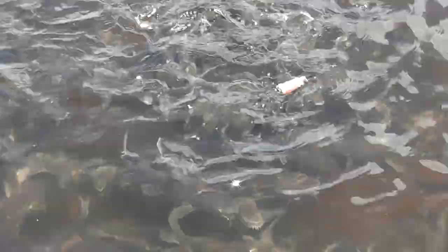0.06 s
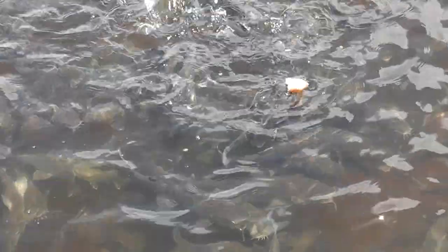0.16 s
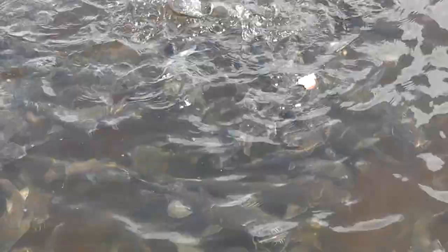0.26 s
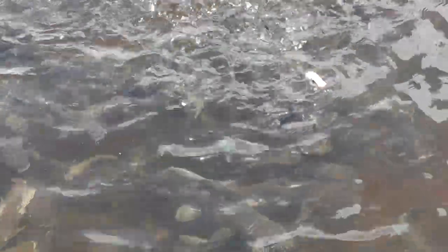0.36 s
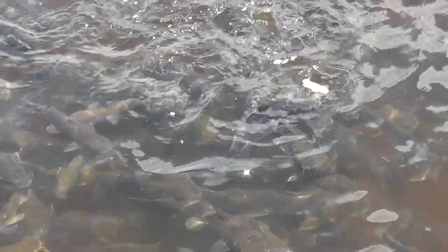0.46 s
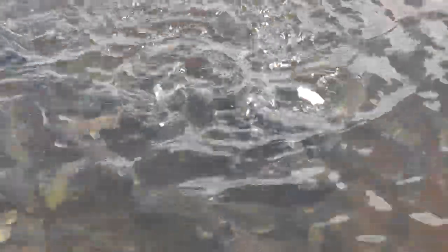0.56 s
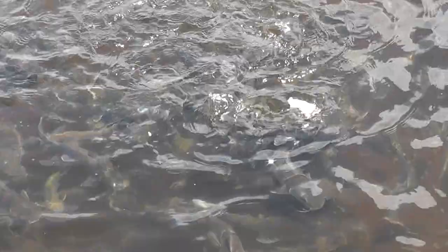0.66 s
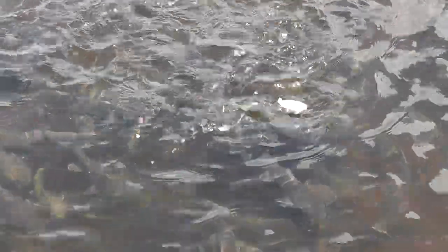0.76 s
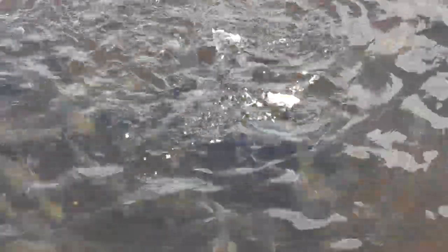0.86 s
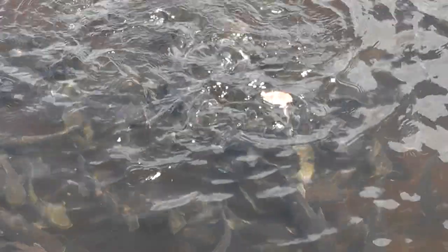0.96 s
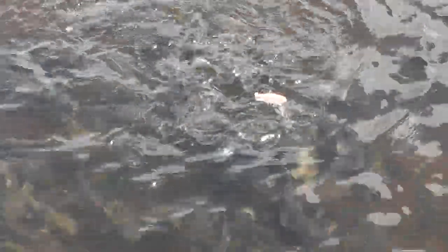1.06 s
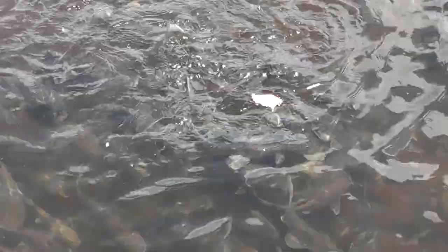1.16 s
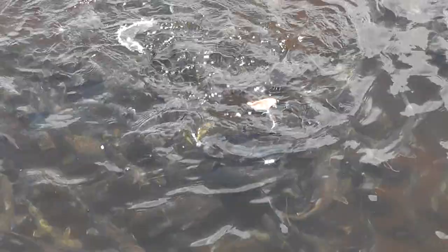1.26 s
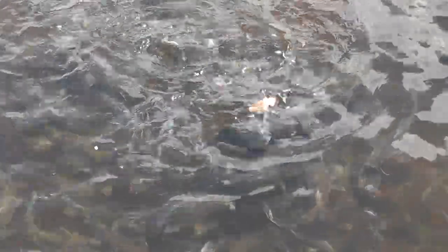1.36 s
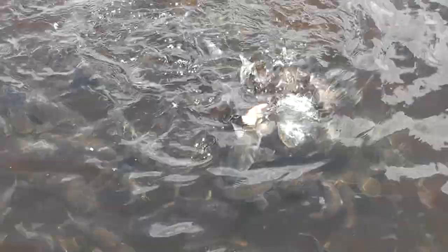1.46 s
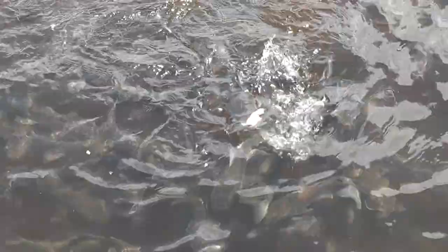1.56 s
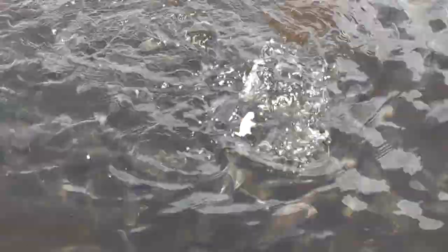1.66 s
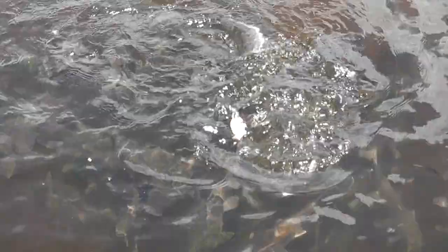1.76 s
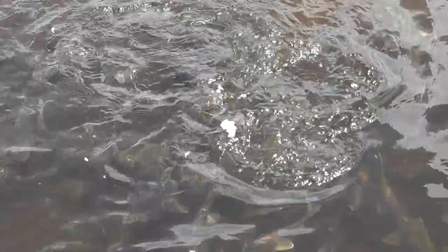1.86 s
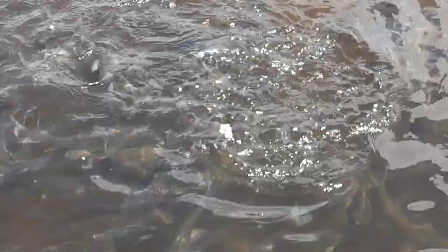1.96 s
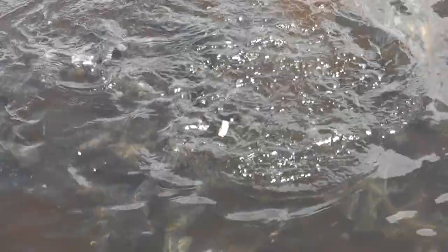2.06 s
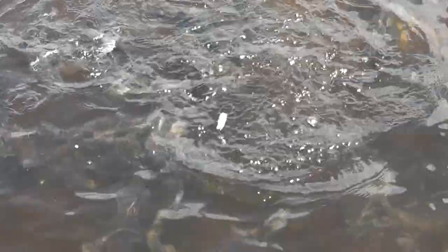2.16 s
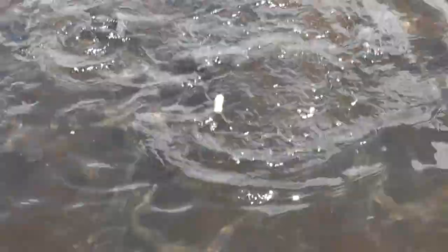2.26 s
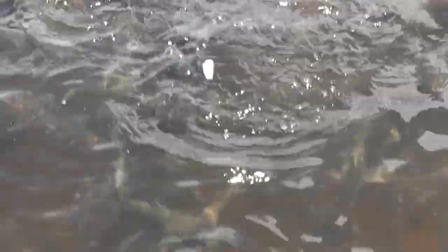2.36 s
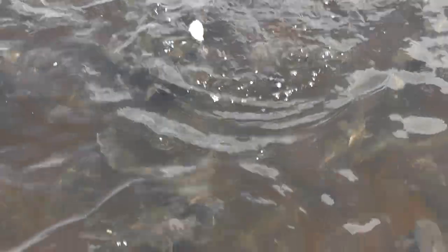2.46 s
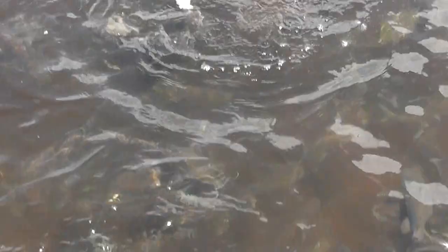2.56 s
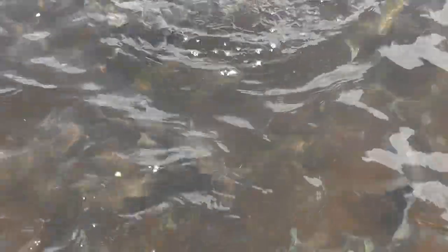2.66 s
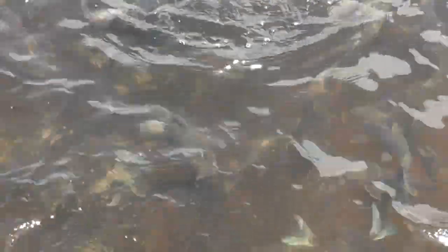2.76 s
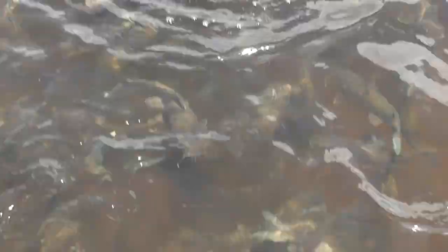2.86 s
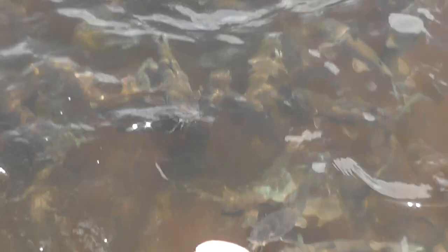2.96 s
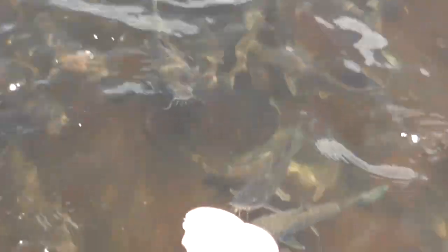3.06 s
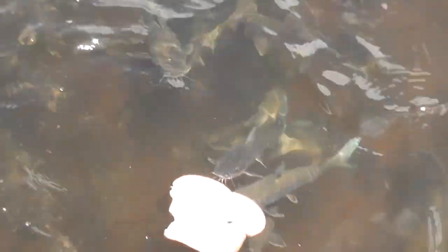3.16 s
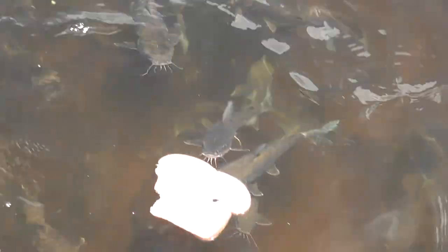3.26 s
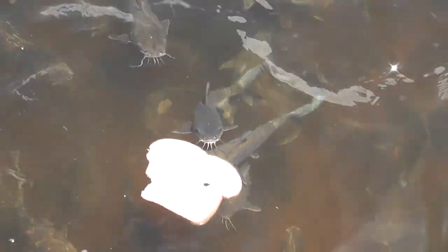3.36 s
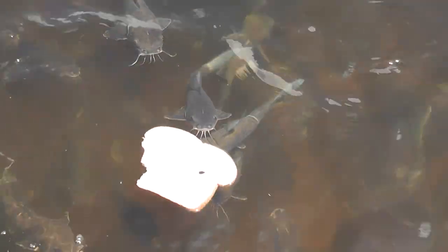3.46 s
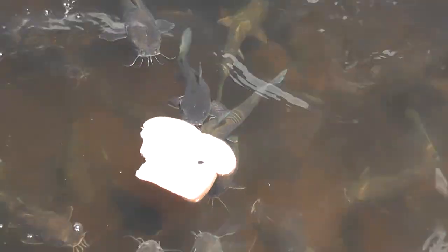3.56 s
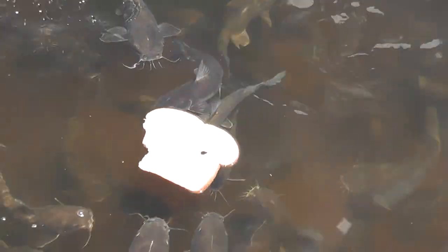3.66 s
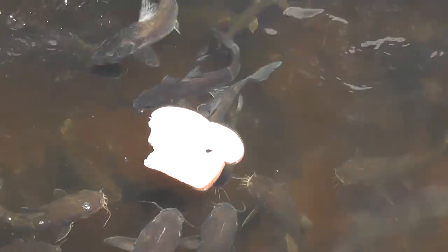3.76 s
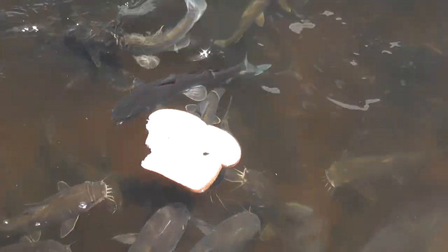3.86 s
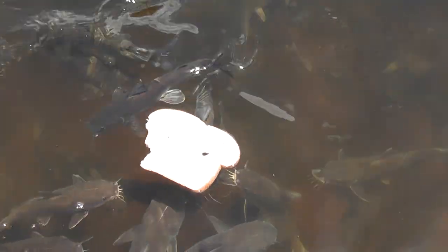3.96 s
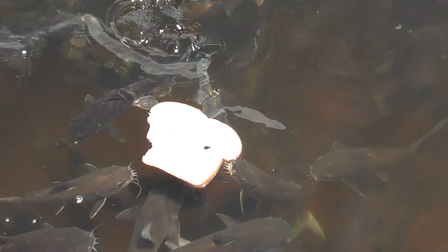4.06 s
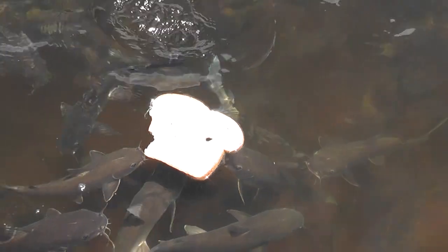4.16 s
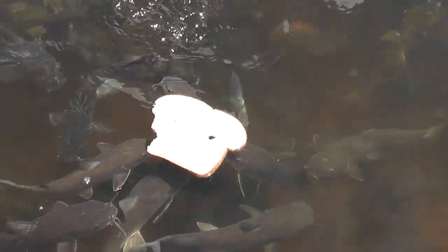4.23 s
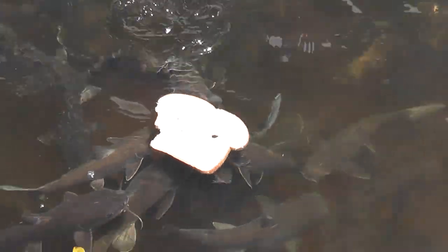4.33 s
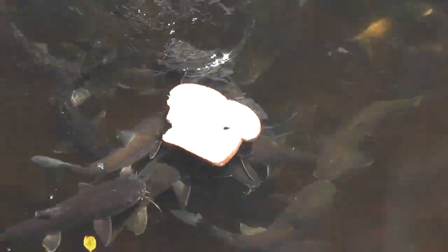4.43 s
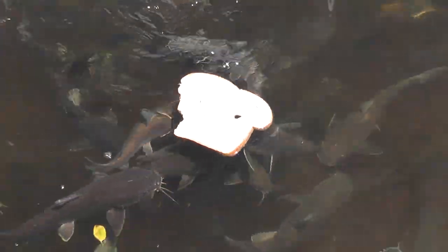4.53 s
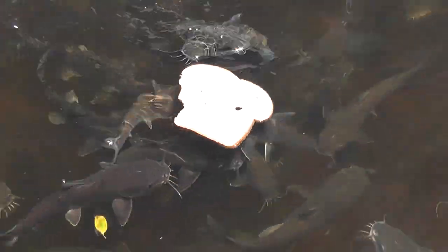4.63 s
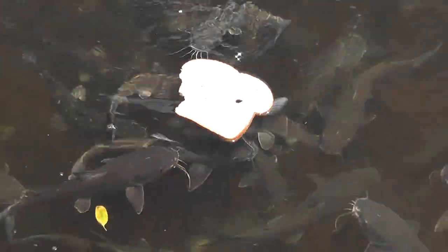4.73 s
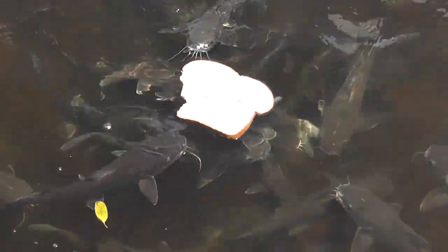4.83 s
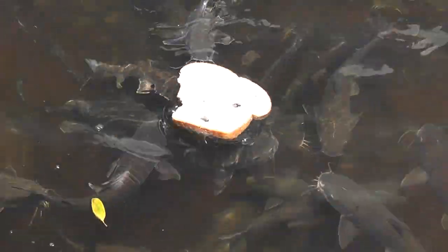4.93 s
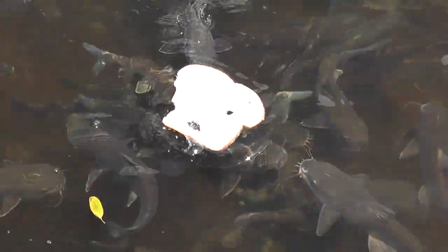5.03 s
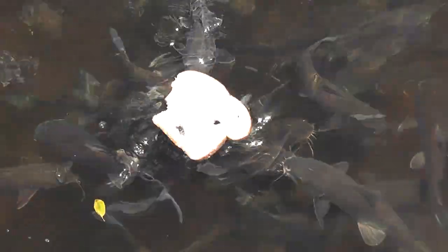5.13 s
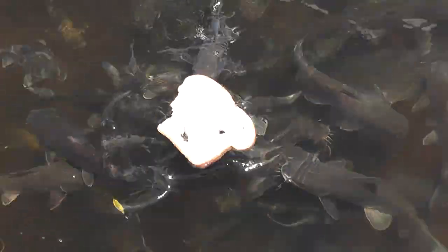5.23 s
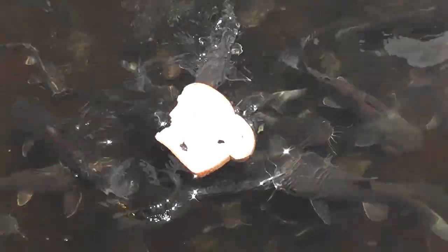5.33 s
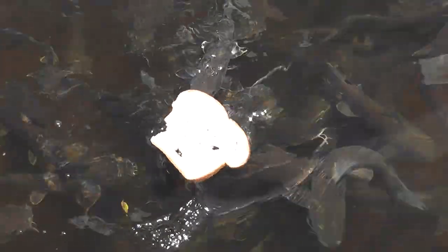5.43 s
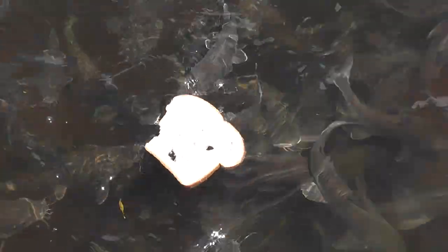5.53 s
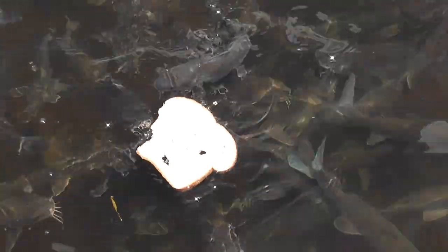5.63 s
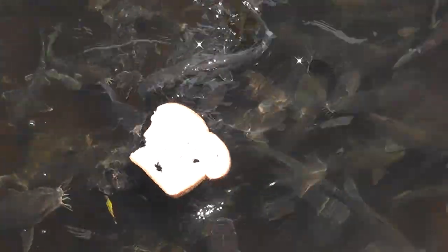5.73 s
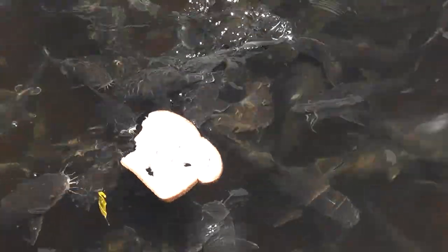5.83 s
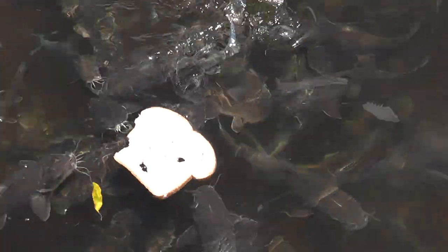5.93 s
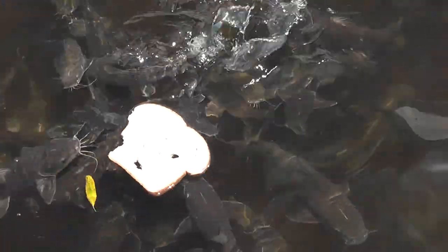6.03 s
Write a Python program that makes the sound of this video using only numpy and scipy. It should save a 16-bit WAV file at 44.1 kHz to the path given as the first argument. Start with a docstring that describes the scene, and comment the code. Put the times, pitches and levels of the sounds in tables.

```python
"""Catfish snatch at bread floating beside a dock, heard from a metre or two above the water.
First come faint plops, drips and light slaps; from about 1.1 s loud slaps and ringing air pockets crowd together.
Near 2.3 s it calms to soft low bumps; after 3 s the slaps, plops and sweeping hollows return in bursts to the end.
Mouths and tails slap the surface, trapped air rings, and closing hollows sweep up in pitch.
Tail strokes set the water gurgling and spray pattering throughout, over a faint outdoor hush."""
import sys
import numpy as np
from scipy import signal
from scipy.fft import rfft, irfft, next_fast_len
from scipy.io import wavfile
from scipy.ndimage import uniform_filter1d

SR = 44100
rng = np.random.default_rng(int(sys.argv[2]) if len(sys.argv) > 2 else 0)


def int16_out(signal):
    """Quantize to a 16-bit WAV file."""
    q = np.round(np.clip(np.atleast_2d(signal).T, -1, 1) * 32767)
    wavfile.write(sys.argv[1], SR, q.astype(np.int16))


N = 268569

# spectrum of water torn by an impact, for slaps and drips: f/Hz, relative density/dB per Hz
IMPACT_SPECTRUM = [(900, -24.5), (1800, -13), (4000, 2), (5500, -4.5), (6500, -0.5), (8500, -0.5),
                   (11000, 3.5), (13500, -8), (16000, -4)]
PLOP_SWELL = 0.095  # share of the nominal length in which a plop or a drip's bubble swells


def undb(db):
    """Amplitude ratio from a level: twenty decibels per factor of ten."""
    return 10 ** (np.asarray(db) / 20)


def unit(x):
    """Normalisation to a root-mean-square value of 1."""
    return x / np.sqrt(np.mean(x ** 2) + 1e-20)


def curves(table):
    """Linear interpolation in time of each column of (t/s, ..) rows."""
    times, *columns = np.transpose(table)
    return [np.interp(np.arange(N) / SR, times, column) for column in columns]


def across(points):
    """Interpolation of (f/Hz, value) points on a logarithmic frequency axis, bin by bin."""
    hz, value = np.transpose(points)
    bins_hz = np.fft.rfftfreq(next_fast_len(N), 1 / SR)
    return np.interp(np.log(bins_hz + 1), np.log(hz), value)


def filtered(x, response):
    """Linear filtering as a product of spectra."""
    size = next_fast_len(N)
    return irfft(rfft(x, size) * response, size)[:N]


def colour(x, points):
    """Minimum-phase filtering: a folded cepstrum makes it causal; white noise keeps its power."""
    size = next_fast_len(N)
    cepstrum = irfft(np.log(unit(undb(across(points)))), size)
    cepstrum[1:size // 2] *= 2
    cepstrum[size // 2:] = 0
    return filtered(x, np.exp(rfft(cepstrum)))


def add(track, s, sound):
    """Superposition of a sound that starts at time s."""
    i = int(np.clip(s * SR, 0, N - 1))
    track[..., i:i + sound.shape[-1]] += sound[..., :N - i]


def walk(rate):
    """Smoothed random fluctuation: held chance values, rate per second, averaged to rms 1."""
    hold = max(int(SR / rate), 1)
    steps = np.repeat(rng.standard_normal(N // hold + 1), hold)
    return unit(uniform_filter1d(steps, hold)[:N])


def placed(x, pan_db):
    """Stereo position by level difference, left minus right."""
    return np.array([x * undb(pan_db / 2), x * undb(-pan_db / 2)])


def bubble(first_hz, last_hz, length, swell, fall_db=24, bend=1.213):
    """Damped resonance of trapped air: it swells and dies; its pitch glides ever faster near the surface."""
    u = np.arange(int(1.6 * length * SR)) / (length * SR)  # time in nominal lengths
    swell = np.clip(swell, .02, .85)
    hz = first_hz * (last_hz / first_hz) ** (u ** bend)  # last_hz is reached at u = 1
    rise = np.sin(np.pi / 2 * np.minimum(u / swell, 1))
    fall = undb(-fall_db * np.maximum(u - swell, 0) / (1 - swell))
    close = np.minimum((u[-1] - u) * 4, 1)  # ends at zero
    return rise * fall * close * np.sin(2 * np.pi * np.cumsum(hz) / SR)


def swarm(rate, low_hz, high_hz, cycles, glide, spread_db):
    """Random superposition of bubbles, rate per second, with chance pitch, damping and place; rms 1."""
    out, total = np.zeros((2, N)), int(rate * N / SR)
    for k, (when, size, life, climb, strength, side, swell) in enumerate(rng.random((total, 7))):
        hz = low_hz * (high_hz / low_hz) ** size
        length = cycles * 4 ** (life - .5) / hz  # half to twice the usual cycles
        ring = bubble(hz, hz * (1 + glide * (climb - .3)), length, .04 + .3 * swell ** 2)
        gain = undb(spread_db * strength ** 2)  # many faint, a few clear
        add(out, (k + 3 * when) / rate, placed(gain * ring, 10 * (side - .5)))
    return unit(out)


def patter(rate, spread_db):
    """Random impulse process: droplet clicks of unequal size, rate per second; rms 1."""
    falls = rng.random(N) < rate / SR
    size = undb(spread_db * np.minimum(rng.exponential(size=N), 4))
    return unit(falls * size * rng.choice([-1, 1], N))


def slaps():
    """Surface impact: contact cracks and tears the water, over a dull smack of displaced water."""
    # slaps and snaps: t/s, relative spray level/dB, relative body level/dB, decay time/s
    impacts = [(.026, -45, -41.5, 0.0045), (.313, -60, -45.5, 0.0099), (.970, -37, -39.5, 0.00064),
               (.98, -57, -37, 0.0092), (1.076, -43, -40, 0.015), (1.362, -17, -30.5, 0.011),
               (1.377, -28, -32.5, 0.007), (1.992, -34, -31.5, 0.0011), (2.884, -34.5, -40, 0.004),
               (3.006, -38.5, -44.5, 0.0055), (3.1102, -22, -33, 0.0065), (3.2502, -43, -43, 0.0044),
               (3.279, -60, -39, 0.01), (3.482, -39.5, -59, 0.011), (3.682, -33, -30.5, 0.0047),
               (3.799, -52, -34, 0.0017), (4.132, -34, -40.5, 0.018), (4.205, -42, -41.5, 0.005),
               (4.209, -22.5, -39, 0.0027), (4.336, -25, -31, 0.0069), (4.878, -40.5, -59, 0.01),
               (4.905, -43, -46, 0.0045), (4.911, -18, -38, 0.0049), (4.919, -25.5, -37.5, 0.0084),
               (5.001, -37, -37, 0.0072), (5.094, -34, -45, 0.0039), (5.131, -34, -61, 0.00081),
               (5.676, -42.5, -44, 0.0014), (5.702, -48, -38, 0.0014), (5.824, -30.5, -35.5, 0.0087),
               (5.996, -35, -35, 0.00084)]
    # dull smack of displaced water: f/Hz, relative density/dB per Hz
    body_spectrum = [(60, -23), (250, -4.5), (450, -1), (700, 2.5), (1300, 3.5), (2200, -2.5), (4500, -12)]
    crack, spray, body = np.zeros((3, N))
    for s, spray_db, body_db, decay in impacts:
        t = np.arange(int(6 * decay * SR)) / SR
        burst = (1 - np.exp(-t / (0.1 * decay))) * np.exp(-(t / decay) ** 1.24)
        add(crack, s + .0005, undb(spray_db + 8.5) * np.ones(1))  # one-sample impulse
        add(spray, s, undb(spray_db - 0.5) * burst)
        add(body, s, undb(body_db + 4.0) * burst)
    bright = colour(crack + spray * patter(rate=9000, spread_db=3.0), IMPACT_SPECTRUM)
    dull = colour(body * patter(rate=9300, spread_db=0.5), body_spectrum)
    return bright + dull


def plops():
    """Bubble resonance: air pinched off under the surface rings and rises slightly in pitch."""
    # air pockets: t/s, first pitch f/Hz, nominal length/s, nominal peak level/dB
    pockets = [(0.255, 1300, 0.0079, -28.5), (0.317, 734, 0.03, -39), (0.522, 1080, 0.03, -46.5),
               (0.733, 1290, 0.027, -49), (1.082, 730, 0.0071, -25), (1.131, 300, 0.021, -39.5),
               (1.335, 595, 0.016, -31), (1.467, 1520, 0.0023, -20.5), (1.505, 627, 0.021, -30.5),
               (1.644, 1420, 0.015, -31), (1.777, 572, 0.013, -19.5), (1.778, 850, 0.018, -18),
               (1.812, 900, 0.019, -24), (1.851, 425, 0.041, -28), (2.173, 920, 0.038, -44),
               (2.414, 1280, 0.015, -41), (2.591, 400, 0.054, -46.5), (2.868, 660, 0.041, -43.5),
               (3.116, 640, 0.018, -32.5), (3.484, 1640, 0.0079, -31.5), (3.634, 711, 0.062, -35.5),
               (3.799, 2640, 0.0065, -26), (3.868, 721, 0.047, -21.5), (3.911, 724, 0.028, -27.5),
               (4.337, 1188, 0.028, -31), (4.338, 578, .011, -27), (4.837, 374, 0.089, -50.5),
               (4.903, 824, 0.012, -27.5), (4.914, 607, .017, -18.5), (5.095, 645, 0.013, -28),
               (5.379, 726, 0.022, -36.5), (5.675, 455, 0.0048, -28.5), (5.837, 573, 0.02, -34.5),
               (5.943, 747, 0.024, -31)]
    out = np.zeros(N)
    for s, hz, length, db in pockets:
        add(out, s, undb(db) * bubble(hz, hz * 1.06, length, PLOP_SWELL))
    return out


def hollows():
    """Cavity resonance: pitch climbs as a hollow in the surface closes and sinks as it opens."""
    # hollows: t/s, first pitch f/Hz, glide/(octaves per s), nominal peak level/dB
    cavities = [(.172, 406, 10.5, -41), (.21, 578, 20.5, -41.5), (1.149, 202.5, 17.5, -35.5),
                (1.17, 332, 32, -33), (1.234, 269, 19.5, -39.5), (1.365, 466, -45, -29),
                (1.468, 1221, -26.5, -34), (1.584, 225, 14, -41), (1.816, 325, 13.5, -33.5),
                (1.957, 698, 9.5, -37), (2.657, 908, 20, -48.5), (3.283, 795, 32, -39.5),
                (3.428, 555, 13.5, -44.5), (3.697, 850, 33, -33.5), (4.24, 1840, 9, -50),
                (4.39, 755, 38.5, -47.5), (4.391, 414, 34.5, -42), (4.447, 595, 22, -47.5),
                (5.005, 360, 21, -42), (5.34, 462, 26.5, -49), (5.917, 497, 25.5, -41.5),
                (5.946, 1190, 24, -42), (6.036, 629, 17, -36.5)]
    usual_length, usual_glide = 0.048, 26.2  # s, octaves per s
    hurry = 0.29  # power by which a faster hollow is briefer
    out = np.zeros(N)
    for s, hz, glide, db in cavities:
        length = usual_length * (usual_glide / abs(glide)) ** hurry
        add(out, s, undb(db) * bubble(hz, hz * 2 ** (glide * length), length, swell=0.31))
    return out


def gulps():
    """Amplitude modulation: large bubbles and hollows wobble a little as they change shape."""
    wobble_db = 1.86 * walk(rate=270)
    return (plops() + hollows()) * undb(wobble_db)


def stirring():
    """Power addition: each stroke builds up, holds and settles into a wake; returns two levels in dB."""
    # strokes of a tail: t/s, length/s, relative gurgle level/dB, relative spray level/dB
    tail_strokes = [(.01, .03, -58, -61.5), (0.167, 0.053, -50.5, -78), (0.241, .15, -56.5, -62.5),
                    (0.453, 0.033, -66, -63.5), (0.732, 0.083, -65.5, -73), (1.109, 0.1, -45.5, -56),
                    (1.247, 0.086, -40.5, -55.5), (1.39, 0.063, -47.5, -58.5), (1.467, 0.073, -38.5, -50.5),
                    (1.57, 0.2, -46, -58), (1.772, .1, -39, -52.5), (1.913, 0.086, -43, -45),
                    (2.063, 0.056, -49.5, -55), (2.447, 0.061, -61.5, -61.5), (2.534, 0.89, -63.5, -72),
                    (3.259, 0.13, -48.5, -59.5), (3.405, 0.23, -57.5, -55.5), (3.676, .08, -50.5, -56.5),
                    (3.787, 0.17, -44, -53), (3.991, 0.086, -53.5, -52.5), (4.195, 0.076, -57, -69),
                    (4.374, 0.041, -51.5, -87), (4.916, 0.24, -52, -61), (5.179, 0.02, -45.5, -52.5),
                    (5.361, 0.15, -49.5, -60.5), (5.666, 0.033, -50.5, -68), (5.826, 0.19, -56.5, -70),
                    (6.044, 0.057, -42, -55)]
    attack_s, settle_db_per_s = 0.0074, 230  # build-up, then first calming
    wake_db, wake_db_per_s = -8.5, 65.5  # wake level against the stroke, and its slower fade
    calm_db = [[-72.5], [-77]]  # lapping between strokes: gurgle, spray
    t = np.arange(N) / SR
    power = undb(calm_db) ** 2 * np.ones(N)
    for s, length, gurgle_db, spray_db in tail_strokes:
        since = t[:N - int(np.clip(s * SR, 0, N - 1))]
        after = np.maximum(since - length, 0)
        fading = np.maximum(-settle_db_per_s * after, wake_db - wake_db_per_s * after)
        shape = np.minimum(since / attack_s, 1) * undb(fading)
        add(power, s, (undb([[gurgle_db], [spray_db]]) * shape) ** 2)
    return 10 * np.log10(power)


def churn():
    """Random bubble and droplet excitation: stirred water gurgles, chirps and fizzes, and spray ticks."""
    # spectra of low slosh, middle crackle and high spray: f/Hz, relative density/dB per Hz
    slosh_spectrum = [(150, -21.5), (350, 4), (700, -11), (1300, 4), (2500, -14.5)]
    crackle_spectrum = [(900, -19), (1600, -5), (3200, 6.5), (4500, 2.5), (7000, -17.5)]
    spray_spectrum = [(3000, -31), (5500, 0.5), (7000, -3), (11000, 5.5), (13500, -3.5), (16000, -20)]
    gurgle_db, spray_db = stirring()
    fizz_db = gurgle_db + 0.68 * (spray_db - gurgle_db)  # small bubbles follow both, the spray more

    gurgle = swarm(rate=280, low_hz=440, high_hz=1800, cycles=15, glide=.6, spread_db=12)
    chirps = swarm(rate=60, low_hz=500, high_hz=1500, cycles=34, glide=1.3, spread_db=8)
    slosh = colour(patter(rate=700, spread_db=2.0), slosh_spectrum)
    low = gurgle + undb(-3) * chirps + undb(-6) * slosh

    fizz = swarm(rate=620, low_hz=1400, high_hz=5200, cycles=16, glide=.25, spread_db=17)
    crackle = colour(patter(rate=400, spread_db=4.0), crackle_spectrum)
    middle = fizz + undb(-5) * crackle

    pings = swarm(rate=650, low_hz=5500, high_hz=12000, cycles=14, glide=.12, spread_db=18)
    spray = colour(patter(rate=800, spread_db=8.0), spray_spectrum)
    high = pings + undb(-2) * spray

    clumps = undb(3.7 * walk(rate=90))  # drops fall back in small groups
    falling = clumps * (undb(fizz_db + 0.03) * middle + undb(spray_db - 3.5) * high)
    return undb(gurgle_db - 3.45) * low + falling


def drips():
    """Impact and entrainment: each drop ticks on the surface and drags down a tiny ringing bubble."""
    # single drops clear of the rest: t/s, relative level/dB, first bubble pitch f/Hz
    drops = [(0.0885, -43.5, 2080), (0.3836, -35, 3000), (0.5023, -39.5, 5640), (0.635, -42, 9100),
             (0.7634, -39.5, 6720), (0.8438, -41.5, 5820), (1.2005, -29.5, 3690), (1.5405, -25, 7860),
             (2.0667, -29.5, 7940), (2.3787, -40, 5740), (2.4781, -35.5, 2630), (3.2126, -39, 2130),
             (5.0727, -30, 3730), (5.9357, -30.5, 2270), (6.0147, -33.5, 2210)]
    ticks, rings = np.zeros((2, N))
    for s, db, hz in drops:
        ring = bubble(hz, hz * 1.024, 22 / hz, PLOP_SWELL)  # nominally 22 cycles long
        add(ticks, s, undb(db + 8) * np.ones(1))
        add(rings, s, undb(db - 1.5) * ring)
    return colour(ticks, IMPACT_SPECTRUM) + rings


def bumps():
    """Partial coherence: dull low bumps start at a different pitch at each port and glide to a common one."""
    # soft low bumps: t/s, common pitch f/Hz, nominal length/s, nominal peak level/dB
    thuds = [(2.307, 93, 0.051, -46), (2.359, 63.4, 0.044, -53), (2.448, 80.6, .05, -48),
             (2.495, 71.4, 0.017, -41.5), (4.782, 99.5, 0.024, -35.5), (4.825, 89, 0.034, -46),
             (5.603, 93.4, .08, -52)]
    out = np.zeros((2, N))
    for s, hz, length, db in thuds:
        for port, detune in zip(out, rng.standard_normal(2)):
            add(port, s, undb(db) * bubble(hz * np.exp(0.21 * detune), hz, length, 0.5))
    return out


def dock(x, echo_s=0.0043, echo_db=-13, tail_t60=0.065, tail_db=-22):
    """Reflection and scattering: the dock's side returns one echo; boards and posts add a short weak tail."""
    t = np.arange(int(.3 * SR)) / SR
    tails = rng.standard_normal((2, len(t))) * undb(-60 * t / tail_t60) * (t > echo_s)
    tails /= np.sqrt(np.sum(tails ** 2, axis=1, keepdims=True))  # unit energy
    echo = np.interp(np.arange(N) - round(echo_s * SR), np.arange(N), x, left=0)
    echo = filtered(echo, undb(across([(600, -43), (2500, -8.0)])))  # a narrow board reflects little bass
    scattered = signal.fftconvolve(x[None], tails, axes=1)[:, :N]
    return undb(echo_db) * echo + undb(tail_db) * scattered


def hush():
    """Diffuse noise as mid plus and minus side: distant outdoor air whose rumble differs between ports."""
    # spectrum of the outdoor air: f/Hz, relative density/dB per Hz
    air_spectrum = [(25, -14.5), (70, 3.5), (160, 2), (300, 4.5), (500, -8.5), (800, -21.5), (1500, -21),
                    (2500, -30), (4000, -27.5), (7000, -30), (11000, -28), (15000, -21)]
    # slow swell of the air: t/s, relative level/dB
    air_swell = [(0, 1.5), (.7, -4.5), (2.3, 0), (4.5, -0.5), (5.2, 1.5), (6.09, 2)]
    mid, side = (colour(rng.standard_normal(N), air_spectrum) for _ in range(2))
    side_db = across([(50, 13), (120, 0), (300, -4.0), (2000, -2.5), (12000, -14.0)])
    side = filtered(side, undb(side_db))
    swell_db = curves(air_swell)[0] + 0.64 * walk(rate=3.21)
    return undb(-61 + swell_db) * (mid + np.array([[1], [-1]]) * side)


def scene():
    """Superposition of direct, reflected and background sound as the fish move about below the microphone."""
    # where the fish are: t/s, left minus right level/dB
    fish_places = [(0.0, -1.5), (0.78, 0), (0.98, -4), (1.66, 0), (3.58, -0.5), (3.81, -3), (4.76, -1.5),
                   (5.39, -3.0), (6.09, -1)]
    water = slaps() + gulps() + drips() + churn()
    pan_db, = curves(fish_places)
    return water * placed(0.96, pan_db) + dock(water.mean(axis=0)) + bumps() + hush()


def record(dry):
    """Linear transfer: two close ports differ in gain and phase; the microphone dulls, a low-pass cuts the top."""
    # how the two microphone ports differ: f/Hz, left minus right level/dB, left phase lead/rad
    port_differences = [(245, 1, -0.1), (614, 0.5, -0.22), (930, -1.2, -0.5), (1410, 0, 0.19),
                        (4430, 1, -0.21), (11700, 1.5, 0.32), (13100, 14.5, -0.254), (14200, -11, -0.028)]
    # the microphone's top end: f/Hz, response level/dB
    mic_response = [(10000, 0), (12500, -2), (15000, -7.5)]
    gain_db = across([(hz, db) for hz, db, _ in port_differences])
    lead = across([(hz, rad) for hz, _, rad in port_differences])
    half = undb(gain_db / 2) * np.exp(.5j * lead)  # each port takes half the difference
    mic = undb(across(mic_response))
    ports = np.array([filtered(dry[0], mic * half), filtered(dry[1], mic / half)])
    low_pass = signal.ellip(10, .2, 70, 16100, fs=SR, output="sos")  # ripple and stopband in dB, edge in Hz
    return signal.sosfilt(low_pass, ports)


dry = scene()
out = record(dry)
int16_out(out)
```